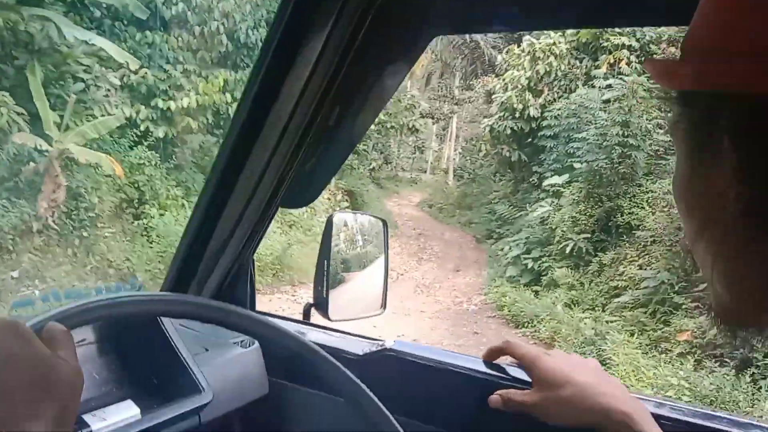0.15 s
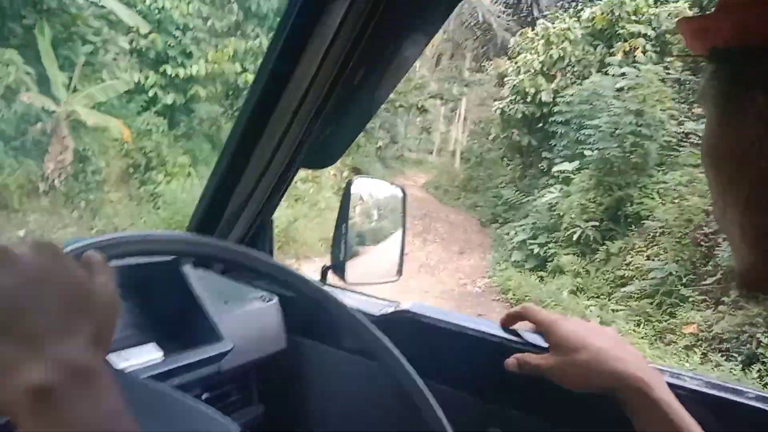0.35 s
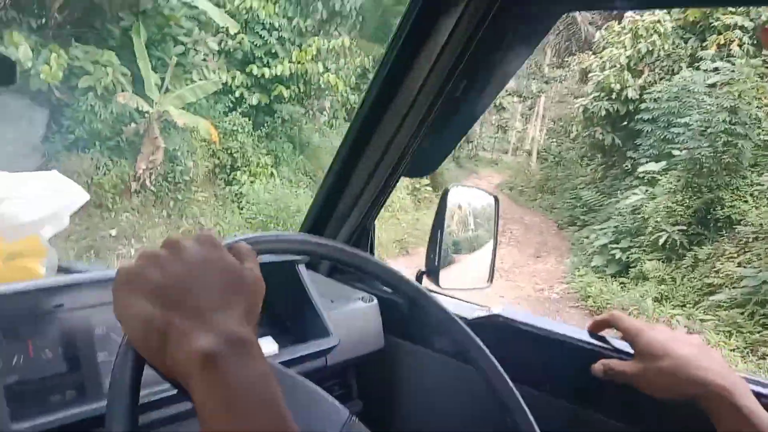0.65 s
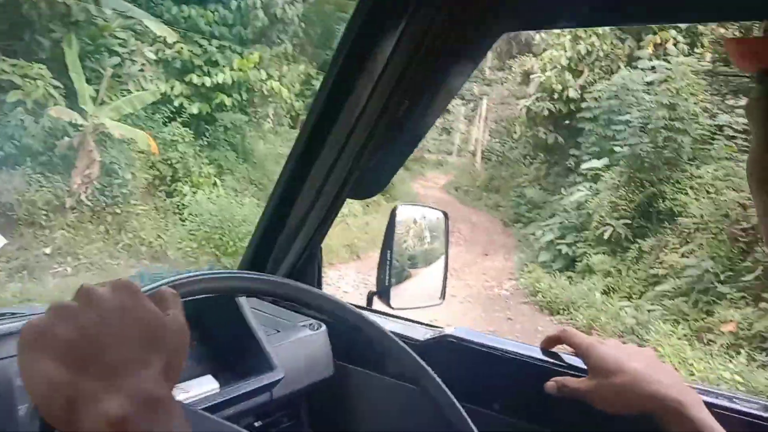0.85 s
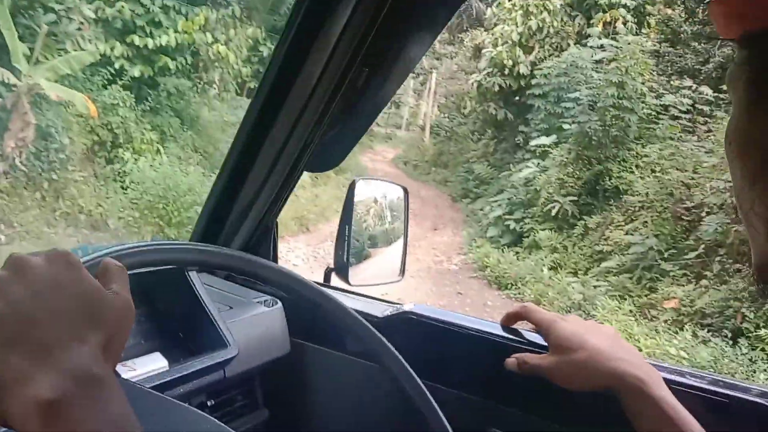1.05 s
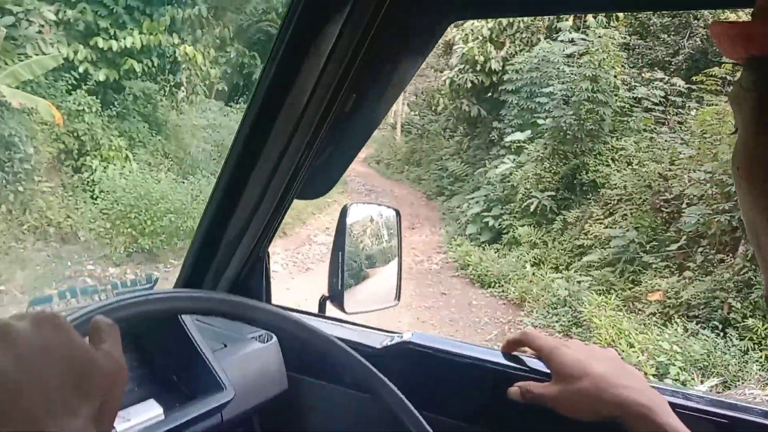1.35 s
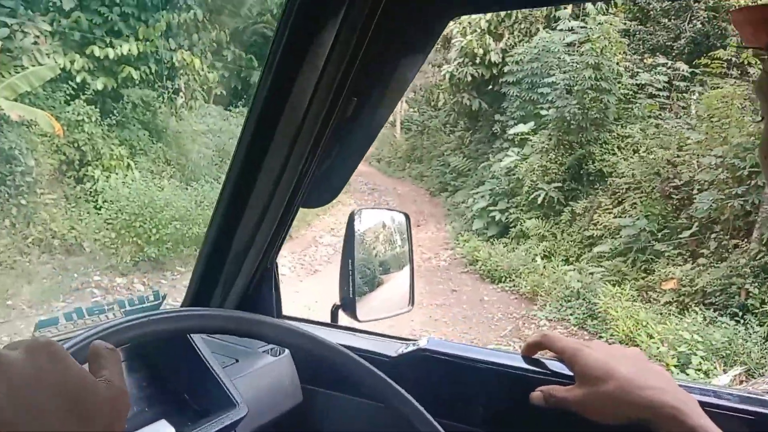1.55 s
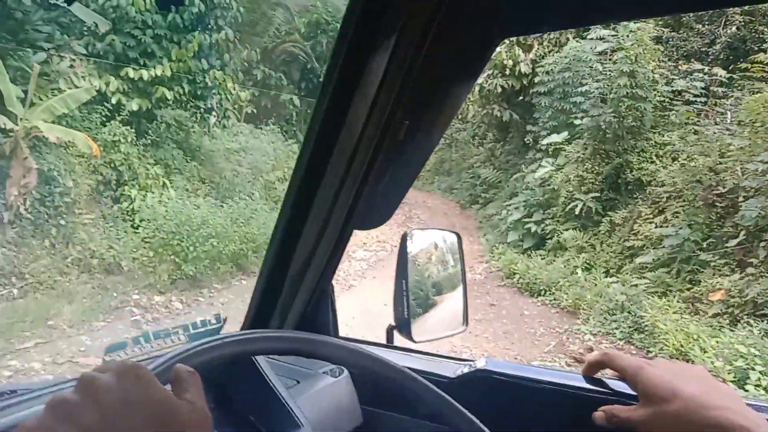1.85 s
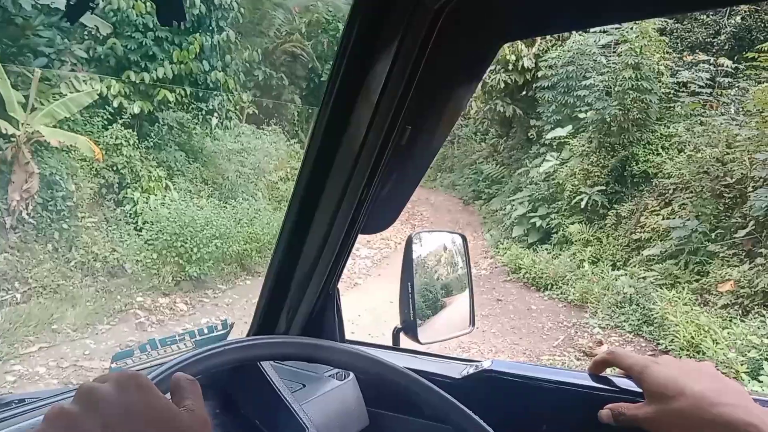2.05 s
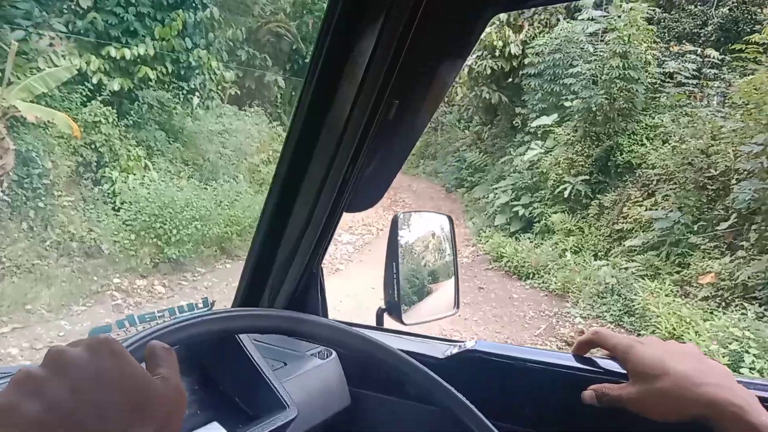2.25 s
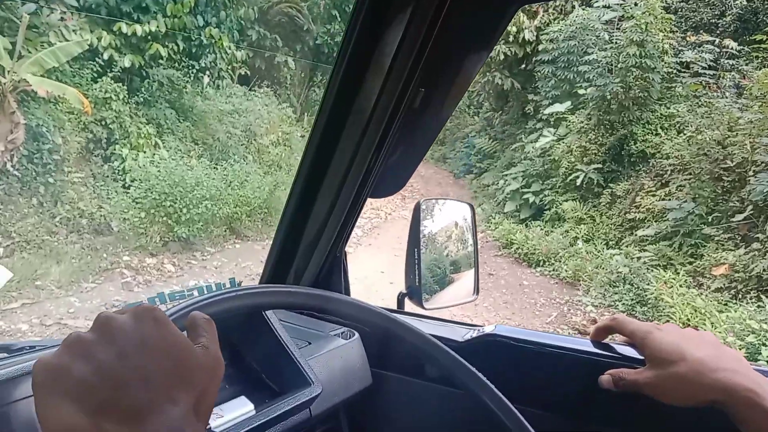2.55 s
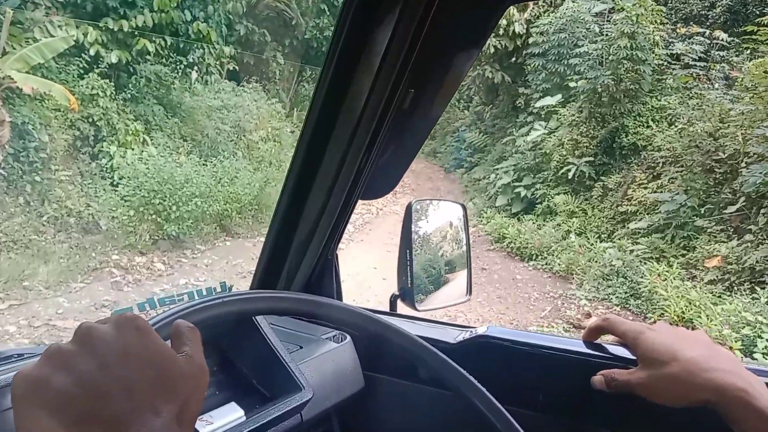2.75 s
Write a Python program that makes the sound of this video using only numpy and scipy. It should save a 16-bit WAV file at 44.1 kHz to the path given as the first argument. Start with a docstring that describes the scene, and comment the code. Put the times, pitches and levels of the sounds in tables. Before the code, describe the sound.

Low truck engine rumble heard in the cab on a rutted track, with rattles and a squeak

```python
"""A truck engine drones at low orders and booms in the cab as the load shifts on a rutted dirt track.
It is built from sine waves and throbbing rumble; broad noise, humming panels and small parts fill the cab.
Loose trim knocks, ticks, jingles and thuds (clicks and noise set parts ringing), creaks and squeaks (tones).
Through the open window come insects: a narrow band of noise for a cricket, a broader hiss for cicadas."""
import sys
import numpy as np
from scipy import signal
from scipy.fft import rfft, irfft
from scipy.io import wavfile

SR = 44100
rng = np.random.default_rng(int(sys.argv[2]) if len(sys.argv) > 2 else 0)


def boost(x):
    """Linear amplitude factor 10**(x/20) for a level x in decibels (scalar or array-like)."""
    u = np.asarray(x, float) / 20
    return 10 ** u


def dump(signal):
    """Clip the signal to [-1, 1] and save it as 16-bit WAV at the path in sys.argv[1]."""
    limited = np.clip(np.atleast_2d(signal).T, -1, 1)
    pcm = np.round(limited * 32767).astype(np.int16)
    wavfile.write(sys.argv[1], SR, pcm)


N = 127890  # length in samples

# Levels in the tables are starting points: the functions add gains and swings of their own.
# engine over time: time_s, firing_hz, third_order_db, fifth_order_db, rumble_db, deep_rumble_db
ENGINE_COURSE = [(0.0, 24.24, -42.5, -35, -39.5, -46), (0.18, 24.03, -50.5, -52.5, -44.5, -57),
                 (0.38, 23.9, -46, -48.5, -43, -45), (0.6, 23.5, -64, -55.5, -50, -70),
                 (0.79, 24.44, -47, -39, -36, -61), (0.86, 23.73, -64, -56, -46.5, -58),
                 (0.97, 23.72, -33.5, -41.5, -37.5, -40.5), (1.05, 25.01, -57, -59, -53, -48),
                 (1.1, 24.77, -66, -41, -31, -49), (1.23, 24.01, -68, -55, -40, -55),
                 (1.28, 24, -38, -41, -50, -39), (1.34, 24.3, -63, -38.5, -37.5, -65),
                 (1.51, 24.86, -39.5, -39, -36, -50), (1.55, 24.92, -60.5, -70, -53, -50),
                 (1.89, 26.01, -42.5, -67, -46.5, -46), (2.0, 24.46, -53, -65, -49.5, -59.5),
                 (2.3, 25.1, -35, -61.5, -44.5, -43), (2.58, 25.23, -44, -60, -48.5, -52.5),
                 (2.9, 24.58, -34, -44, -46.5, -44)]
# weaker engine orders: multiple of the firing rate, level_db (against the rumble)
WEAK_ORDERS = [(4, -7.5), (6, -9.5), (7, -19.5)]
# colour of the engine rumble: frequency_hz, level_db (per Hz)
RUMBLE_COLOUR = [(13, -24), (22, -28), (43, -20), (59, 4.5), (75, -12.5), (96, 4.5), (129, -0.5),
                 (183, -6.5), (260, -15.5), (340, -21.5), (570, -120)]
# colour of the cab noise: frequency_hz, level_db (per Hz)
CAB_COLOUR = [(120, -41), (200, -21.5), (416, -10), (800, -14), (1000, -8), (1940, -7), (2610, -23),
              (4000, -18.5), (5900, -21), (7800, -22), (9060, -29.5), (16000, -33)]
# loudness of the cab noise over time: time_s, level_db
CAB_LOUDNESS = [(0.0, -45.5), (0.08, -53), (0.54, -55.5), (0.76, -54), (1.23, -49.5), (1.61, -55.5),
                (1.87, -55), (2.76, -55), (2.9, -49)]
# panels that hum along: centre_hz, width_hz, level_db, swing_db
HUMMING_PANELS = [(306.2, 30.5, -64, 3), (569, 20.5, -73, 6.5), (709, 45, -72.5, 5.5), (982, 37, -73, 5.5),
                  (1453, 74, -74, 8.5)]
# knocks of loose trim: start_s, below_800_hz_db, to_3_khz_db, to_8_khz_db, above_8_khz_db, rise_s, chatter_s
TRIM_KNOCKS = [(.001, -73, -36.5, -41.5, -38.5, 0.00018, 0.015),
               (1.225, -30, -30, -33, -28, 0.0013, 0.0087), (1.243, -48, -12, -15.5, -5.5, 0.0017, 0.0066),
               (1.254, -38, -12.5, -15, -7, 0.0059, 0.0061), (1.803, -59, -23.5, -18.5, -24, 0.0046, 0.011),
               (1.813, -63, -20, -25.5, -21.5, 0.003, 0.012), (2.44, -58, -29, -35, -30, 0.0018, 0.0077),
               (2.449, -56, -19.5, -18, -18.5, 0.00047, 0.0055),
               (2.459, -43, -24, -15, -19, 0.00035, 0.0042), (2.465, -24, -18, -31, -29, 0.00092, 0.017)]
# ringing tones of the trim: pitch_hz, level_db, t60_s (time to fall by 60 dB)
TRIM_MODES = [(705, -4, 0.12), (856, -3, 0.1), (1205, -8, 0.09), (1410, -7, 0.09), (1570, -5, 0.09),
              (1830, -6, 0.07), (2090, -6, 0.06), (2388, -7.5, .06), (3250, -9, 0.06), (4760, -7, .05),
              (5260, -6, 0.05), (5500, -5, 0.05), (5740, 2, 0.04), (5920, -3, 0.05), (6260, -2, 0.04)]
# colour of the noise in a knock: frequency_hz, level_db (per Hz)
KNOCK_COLOUR = [(450, -36), (600, -2.5), (830, -23.5), (1810, 1), (2420, -30), (2800, -12.5), (3300, -13),
                (3950, -13.5), (5710, -4.5), (8970, -21), (13500, -20), (16000, -33)]
# how fast knock noise dies, before chatter length stretches it: frequency_hz, t60_s
KNOCK_DECAY = [(500, 0.26), (2000, 0.086), (6000, 0.083), (15000, 0.02)]
# creaks and brief hums: start_s, length_s, start_hz, end_hz, level_db
CREAK_GLIDES = [(.39, 0.07, 480, 590, -47), (0.47, 0.1, 520, 420, -45.5), (0.68, 0.11, 605, 525, -47),
                (0.914, 0.046, 540, 570, -47), (1.308, 0.086, 1836, 1960, -49),
                (0.085, 0.13, 1936, 1938, -49), (0.093, .1, 1450, 1457, -51),
                (1.551, 0.052, 300, 297, -47.5), (1.84, 0.092, 310, 318, -40),
                (2.243, 0.092, 312, 312, -47.5), (2.475, 0.07, 318, 311, -42),
                (2.814, 0.051, 310, 323.2, -50), (1.877, 0.086, 699, 693, -50),
                (2.237, 0.08, 705, 705, -48.5), (2.8, .09, 698, 687, -44), (2.6, 0.055, 699, 697, -49),
                (0.87, 0.1, 1450, 1560, -53), (0.47, 0.09, 1950, 1900, -55)]
# bright ticks: start_s, peak_db, pitch_hz, t60_s
BRIGHT_TICKS = [(0.366, -48.5, 8850, 0.067), (0.624, -49.5, 14600, 0.064), (1.059, -47, 8800, 0.048),
                (1.268, -27.5, 14800, 0.031), (1.4044, -61, 8330, 0.047), (1.752, -45.5, 8850, 0.043),
                (2.051, -65, 9290, 0.088), (2.0747, -63, 15270, 0.23)]
# colour of the puff in a tick: frequency_hz, level_db (per Hz)
TICK_COLOUR = [(2500, 4), (4000, 2.5), (12000, -5), (15500, -7), (16500, -21)]
# ringing tones of the heavier part: pitch_hz, level_db, t60_s
THUD_MODES = [(496, -67, 0.14), (571, -44.5, 0.13), (700.6, -30.5, 0.16), (980, -37.5, 0.072),
              (1062, -35, 0.045), (1300, -35, 0.055), (1366, -37.5, 0.077), (1696, -45.5, 0.1),
              (2860, -37, 0.014), (5270, -39, 0.012)]
# short chirp over time: time_s, pitch_hz, partial_1_db, partial_2_db, partial_4_db
CHIRP_COURSE = [(1.432, 2341, -77, -72, -93), (1.446, 2265, -32.5, -68, -48.5),
                (1.462, 2340, -41, -55, -79), (1.5, 2367, -44.5, -42.5, -64.5),
                (1.564, 2250, -67, -87, -102), (1.59, 2317, -102, -86, -89)]
# long squeak over time: time_s, pitch_hz, partial_1_db, partial_2_db, partial_3_db, partial_4_db
SQUEAK_COURSE = [(1.85, 2712, -55, -77, -76, -75), (1.874, 2710, -34.5, -49, -48, -81),
                 (1.882, 2985, -39, -41, -74, -83), (1.892, 2950, -40.5, -32, -41.5, -62),
                 (1.902, 3040, -24, -33, -54, -52), (1.914, 3178, -21.5, -31.5, -59, -60),
                 (1.949, 3236, -35, -34, -50, -56), (1.955, 3260, -21, -23, -48, -58),
                 (1.961, 3270, -37, -34, -50, -60), (1.98, 3228, -63, -39, -55, -79),
                 (2.022, 3130, -50.5, -42, -62, -88), (2.07, 3060, -60, -43.5, -70, -77)]


def in_time(rows):
    """Draws straight lines between the rows, giving one smooth curve for each column after the time."""
    times, *columns = np.transpose(rows)
    return [np.interp(np.arange(N) / SR, times, column) for column in columns]


def at_hz(points, hz):
    """Reads a table at any frequency, on a logarithmic pitch scale."""
    table_hz, values = np.transpose(points)
    return np.interp(np.log(hz), np.log(table_hz), values)


def rms_one(x):
    """Scales a sound to an average strength (rms) of 1."""
    return x / np.sqrt(np.mean(x ** 2) + 1e-20)


def drift(rate_hz):
    """Slow random wandering around 0 with a spread of 1, made at one eighth of the sample rate."""
    r = np.exp(-16 * np.pi * rate_hz / SR)
    white = rng.standard_normal(N // 8 + 6002)
    slow = signal.lfilter([1], [1, -2 * r, r * r], white)[6000:]  # skip the filter's start
    return np.interp(np.arange(N) / 8, np.arange(len(slow)), rms_one(slow - slow.mean()))


def band(x, low_hz, high_hz, order=2):
    """Keeps mainly the sound between two frequencies."""
    return signal.sosfilt(signal.butter(order, [low_hz, high_hz], "band", fs=SR, output="sos"), x)


def narrow_noise(centre_hz, width_hz):
    """White noise narrowed around one pitch; rms 1."""
    white = rng.standard_normal(N)
    return rms_one(band(white, centre_hz - width_hz / 2, centre_hz + width_hz / 2))


def ring(clicks, hz, t60_s):
    """A part that rings when hit: a click of height 1 starts a dying sine of height 1."""
    r, w = boost(-60 / (t60_s * SR)), 2 * np.pi * hz / SR
    return signal.lfilter([0, np.sin(w)], [1, -2 * r * np.cos(w), r * r], clicks + 1e-18)


def coloured(spectrum):
    """White noise shaped by a frequency table; rms 1."""
    hz = np.maximum(np.arange(N // 2 + 1) * SR / N, 1)
    return rms_one(irfft(rfft(rng.standard_normal(N)) * boost(at_hz(spectrum, hz)), N))


def dying(start_s, db, t60_s):
    """Loudness curve that jumps up at each start and dies away."""
    marks = np.full(N, 1e-18)
    np.add.at(marks, (np.asarray(start_s) * SR).astype(int), boost(db))
    return signal.lfilter([1], [1, -boost(-60 / (t60_s * SR))], marks)


def echo(x, db, t60_s):
    """Hard surfaces answer with a short dense tail, here dying noise."""
    t = np.arange(SR // 3) / SR
    tail = rng.standard_normal(len(t)) * boost(-60 * t / t60_s) * (t > .002)
    return x + boost(db) * signal.fftconvolve(x, tail / np.sqrt(np.sum(tail ** 2)))[:N]


def engine():
    """Sines at multiples (orders) of the firing rate, over rumble throbbing with each firing; ruts jolt it all."""
    hz, third_db, fifth_db, rumble_db, deep_db = in_time(ENGINE_COURSE)
    turn = 2 * np.pi * np.cumsum(hz) / SR  # phase of the firing
    third = boost(third_db + 1.5 * drift(12)) * np.sin(3 * turn + .4 * drift(5))
    fifth = boost(fifth_db) * np.sin(5 * turn + 1)
    out = np.sqrt(2) * (third + fifth)
    out += boost(deep_db + 1.0) * np.sin(2 * turn + drift(2.2))
    for multiple, db in WEAK_ORDERS:
        level = boost(db + rumble_db + 3 * drift(1.27))
        out += level * np.sin(multiple * turn + drift(0.79))
    noise = coloured(RUMBLE_COLOUR) * (1 + 0.5 * np.sin(turn))
    out += boost(rumble_db - 2) * band(noise, 94.4, 350, order=3)
    out += boost(deep_db + 5.5) * band(noise, 38, 79.6)
    jolt_db, jolt_rate_hz = 2.0, 6
    return out * boost(jolt_db * drift(jolt_rate_hz))


def cab():
    """Broad noise, faintly patchy in narrow bands, and panels that hum as narrow noise."""
    patchy_db, patchy_rate_hz, gain_db = 1.6, 36, -5.5
    level_db, = in_time(CAB_LOUDNESS)
    mean_db = level_db.mean()
    noise, edges = [coloured(CAB_COLOUR), coloured(CAB_COLOUR)], np.geomspace(200, 16500, 20)
    out = 0
    for k, (low, high) in enumerate(zip(edges, edges[1:])):
        follows = 1. if high < 5000 else .3  # the treble follows the loudness less
        change_db = follows * (level_db - mean_db) + patchy_db * drift(patchy_rate_hz)
        out = out + band(noise[k % 2], low, high) * boost(change_db)  # neighbours use different noise
    out = out * boost(mean_db + gain_db)
    for hz, width_hz, db, swing_db in HUMMING_PANELS:
        out += boost(db + swing_db * drift(23)) * narrow_noise(hz, width_hz)
    return out


def hums():
    """Many small parts resonate by turns, each ringing to the same noise with its own slow swing."""
    swing_db, swing_rate_hz, t60_s, gain_db = 6.5, 5, .1, -1.5
    level_db, = in_time(CAB_LOUDNESS)
    white, out = rng.standard_normal(N), 0
    for hz in np.geomspace(350, 5500, 44) * rng.uniform(.97, 1.03, 44):
        level = boost(at_hz(CAB_COLOUR, hz) + swing_db * drift(swing_rate_hz))
        out = out + level * rms_one(ring(white, hz, t60_s))
    return boost(level_db + gain_db) * rms_one(out)


def insects():
    """A narrow cricket tone that swells unevenly and a broad cicada hiss, both from filtered noise."""
    cricket = narrow_noise(4353, 72)
    hiss = band(rng.standard_normal(N), 6450, 7500, order=3)
    hiss = rms_one(hiss + 1.5 * band(hiss, 6600, 6950, order=1))  # stronger in its lower half
    cicada = hiss * (1 + .15 * drift(60))
    return boost(-62.5 + 3 * drift(8)) * cricket + boost(-55 + .9 * drift(4)) * cicada


def jingles():
    """Small loose metal bits ring faintly at random: each hit rings one of 24 pitches."""
    hits_per_s, level_db, t60_s = 40, -68, .1
    hits = (rng.random(N) < hits_per_s / SR) * boost(level_db + 3 * rng.standard_normal(N))
    pitches, dealt = np.geomspace(2500, 12500, 24), rng.integers(0, 24, N)
    return sum(ring(hits * (dealt == k), hz, t60_s) for k, hz in enumerate(pitches))


def knocks():
    """Each knock is a short chatter of clicks that rings the trim, plus noise dying band by band."""
    clicks_per_s, ring_db, uneven_db, tail_db = 1000, -11, 4.55, -5
    rows = np.array(TRIM_KNOCKS)

    def level_db(hz):
        """Picks each knock's level for the range that holds this frequency."""
        return rows[:, 1 + (hz > 800) + (hz > 3000) + (hz > 8000)]

    age = np.maximum(np.arange(N) / SR - rows[:, :1], 0)  # seconds since each knock
    rise, length = 1 - np.exp(-age / rows[:, -2:-1]), rows[:, -1:]
    clicks = (rng.random(N) < clicks_per_s / SR) * rng.standard_normal(N)
    bursts = rise * np.exp(-(age / length) ** 2) * clicks
    out = np.zeros(N)
    for k, (hz, db, t60_s) in enumerate(TRIM_MODES):
        strength = boost(ring_db + db + level_db(hz) + rng.normal(0, uneven_db, len(rows)))
        out += (-1) ** k * ring(strength @ bursts, hz, t60_s)
    noise, edges = coloured(KNOCK_COLOUR), np.geomspace(500, 16500, 11)
    for low, high in zip(edges, edges[1:]):
        hz = np.sqrt(low * high)
        t60_s = at_hz(KNOCK_DECAY, hz) * (0.47 + length / 0.023)  # longer chatter, longer tail
        shape = rise * boost(-60 * np.maximum(age - .5 * length, 0) / t60_s)
        out += boost(tail_db) * band(noise * (boost(level_db(hz)) @ shape), low, high, order=3)
    return band(out, 600, 17000, order=3)


def creaks():
    """Short rough tones that glide in pitch, swelling and fading as half a sine."""
    t, out = np.arange(N) / SR, 0
    for start_s, length_s, start_hz, end_hz, db in CREAK_GLIDES:
        u = np.clip((t - start_s) / length_s, 0, 1)  # 0 to 1 along the creak
        hz = start_hz + (end_hz - start_hz) * u + 18 * drift(40)
        turn = 2 * np.pi * np.cumsum(hz) / SR
        out = out + boost(db) * np.sin(np.pi * u) * np.sin(turn) * (1 + .3 * drift(60))
    return out


def ticks():
    """Each tick is a grainy puff of noise, thinner for higher pitch, and one short high ring."""
    puff_db, ring_db = 5.5, 3
    out, noise = np.zeros(N), coloured(TICK_COLOUR)
    for start_s, db, hz, t60_s in BRIGHT_TICKS:
        soft_start = signal.lfilter([.006], [1, -.994], dying([start_s], db + puff_db, t60_s))
        puff = soft_start * noise * boost(4 * drift(300))
        out += band(puff, .4 * hz, 17000, order=1)
        tone = np.sin(2 * np.pi * hz * np.arange(N) / SR + 1.3 * drift(150))
        out += dying([start_s], db + ring_db, t60_s) * tone
    return out


def thud():
    """A soft blow shakes a heavier part: dull clicks ring its modes, with a puff of noise."""
    start_s, rise_s, fall_s, clicks_per_s, puff_db = 1.082, 0.004, 0.018, 2200, -36
    age = np.maximum(np.arange(N) / SR - start_s, 0)
    shape = (1 - np.exp(-age / rise_s)) * np.exp(-age / fall_s)
    clicks = shape * (rng.random(N) < clicks_per_s / SR) * 1.3 * rng.standard_normal(N)
    puff = boost(puff_db) * shape * rms_one(band(rng.standard_normal(N), 660, 3400))
    ringing = sum(boost(db) * ring(clicks, hz, t60_s) for hz, db, t60_s in THUD_MODES)
    return band(ringing, 420, 7000) + puff


def squeak(rows, multiples, spread):
    """Stick-slip tone: three contacts slip at nearly the same trembling pitch, with a bright wash of noise."""
    jitter, rough, fade_s, wash_db = .006, .3, .02, -7
    hz, *levels = in_time(rows)
    t = np.arange(N) / SR
    wash = rms_one(band(rng.standard_normal(N), 11660, 20000))
    out = boost(levels[-1] + wash_db) * wash  # the wash follows the highest partial
    for side, share in [(0, 0.96), (-1.5, 0.3), (1, 0.2)]:  # pitch offset in spreads, strength
        turn = 2 * np.pi * np.cumsum(hz * (1 + side * spread + jitter * drift(200))) / SR
        for k, db in zip(multiples, levels):
            flutter = 1 + rough * (k - .5) * drift(167 * np.sqrt(k))  # higher partials flutter more
            out = out + share * boost(db) * np.sin(k * turn) * flutter
    return out * (t > rows[0][0]) * np.clip((rows[-1][0] - t) / fade_s, 0, 1)


def scene():
    """Adds all sources; the trim and the squeaks get echoes of different length."""
    squeaks = squeak(SQUEAK_COURSE, [1, 2, 3, 4], .02) + squeak(CHIRP_COURSE, [1, 2, 4], .005)
    near = echo(knocks() + thud() + ticks() + creaks() + jingles(), db=-10, t60_s=0.11)
    far = engine() + cab() + hums() + insects()
    return (far + near + echo(squeaks, db=-8, t60_s=0.3))[None]


def top_cut(x):
    """Nothing passes above the cut-off."""
    return signal.sosfilt(signal.butter(12, 16330, fs=SR, output="sos"), x)


def record(dry):
    """A steep low-pass filter cuts the top above 15850 Hz."""
    low_pass = signal.ellip(10, .5, 60, 15850, fs=SR, output="sos")
    mix = signal.sosfilt(low_pass, dry)
    return top_cut(mix)


dry = scene()
out = record(dry)
dump(out)
```